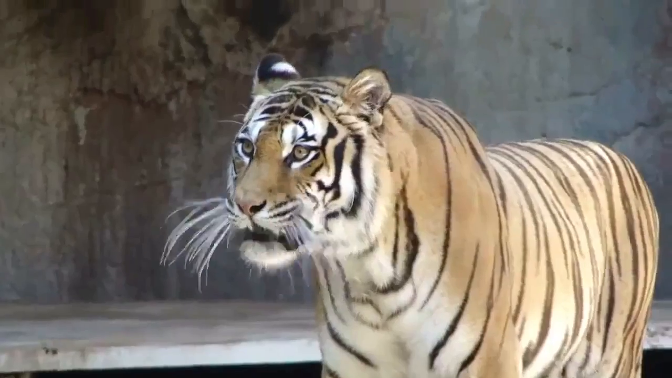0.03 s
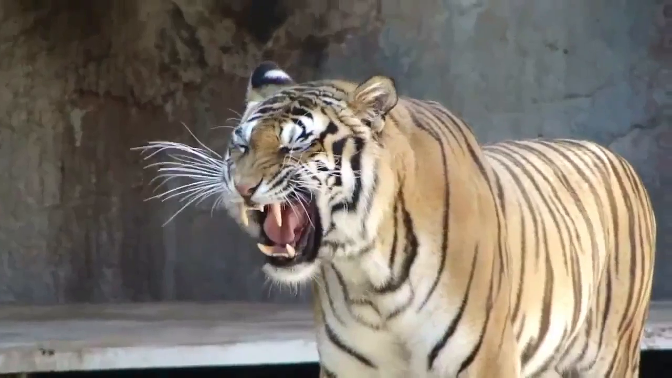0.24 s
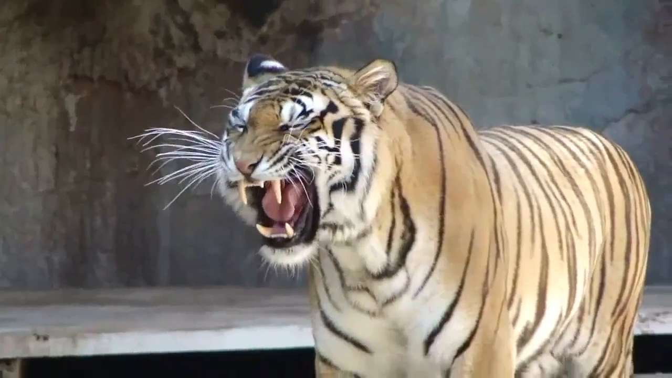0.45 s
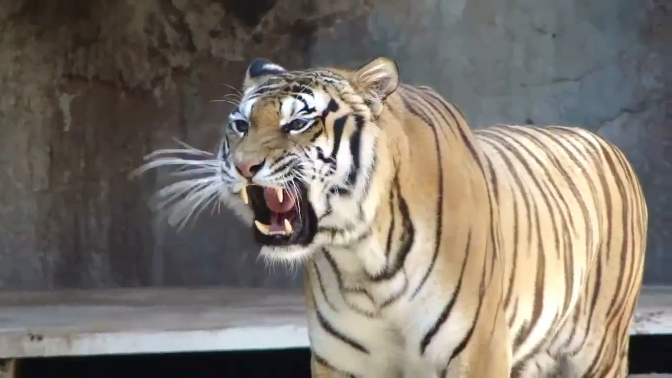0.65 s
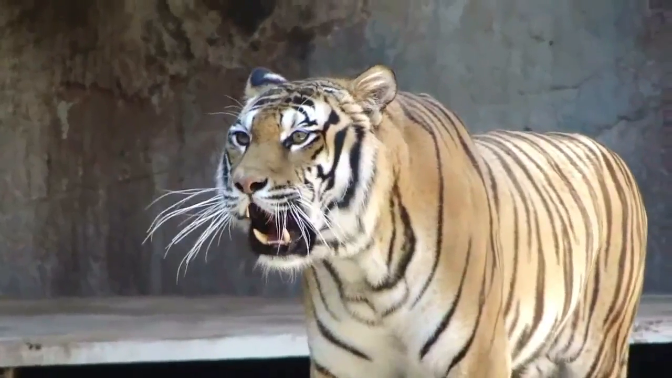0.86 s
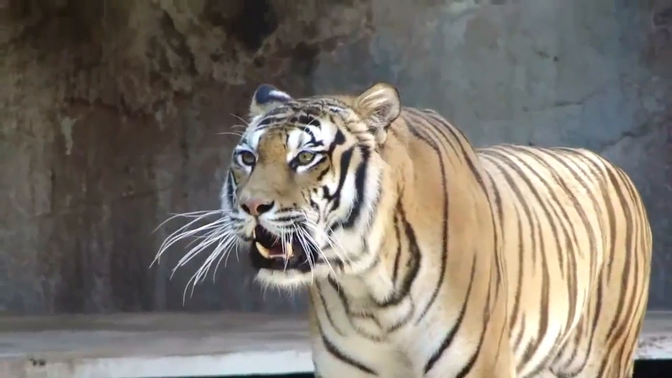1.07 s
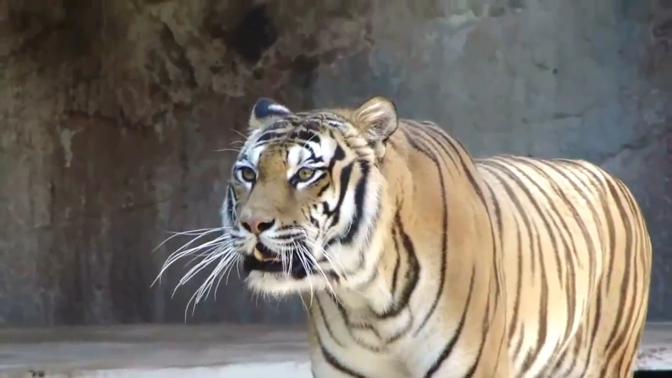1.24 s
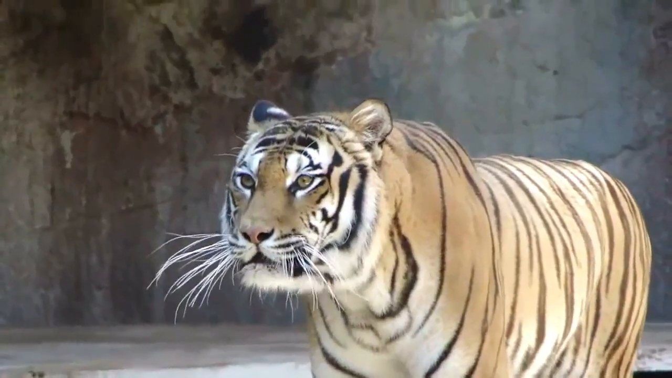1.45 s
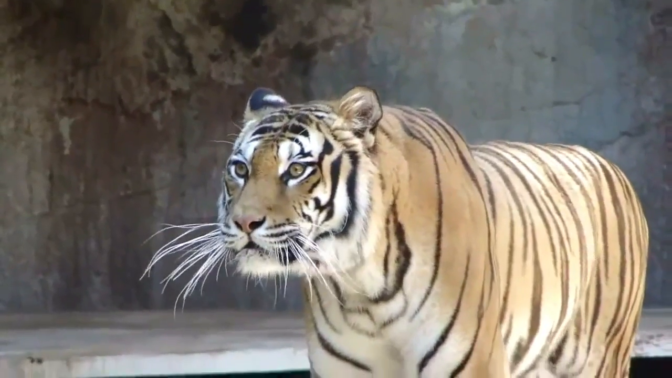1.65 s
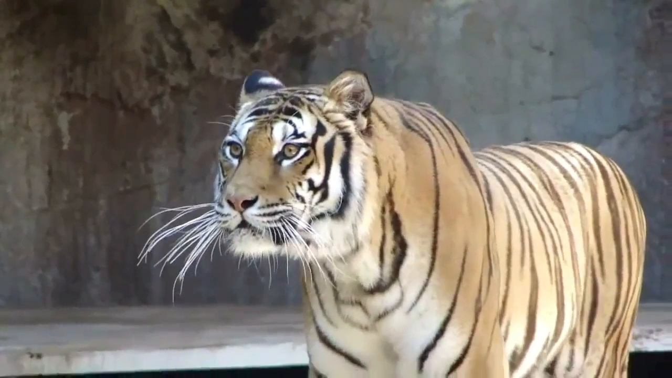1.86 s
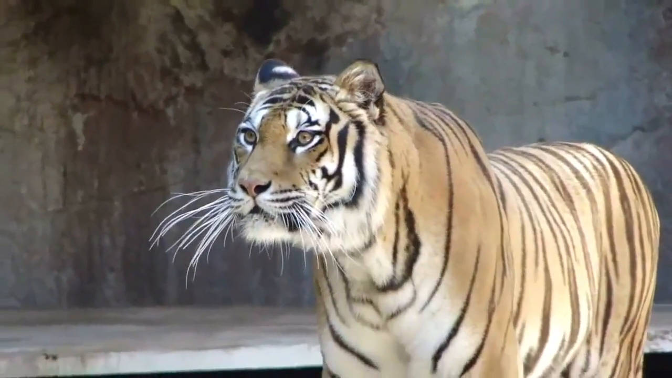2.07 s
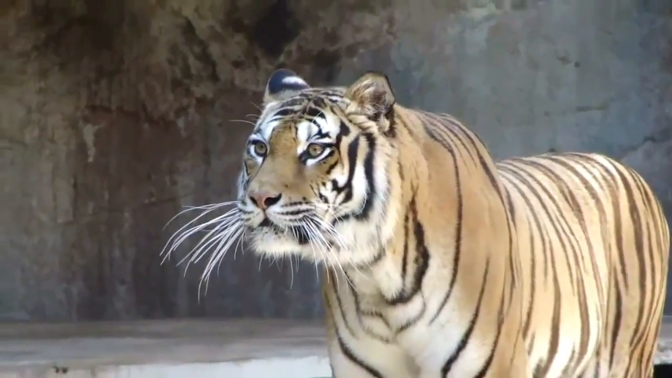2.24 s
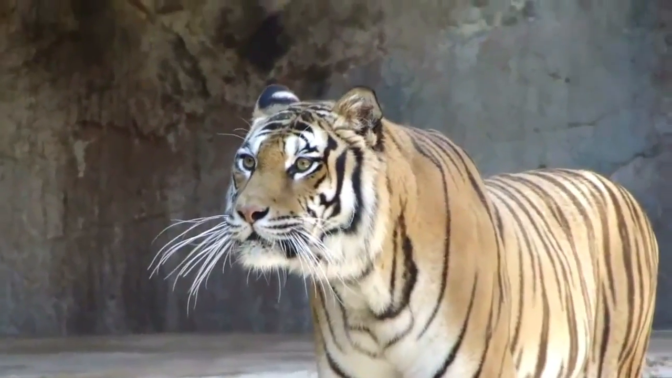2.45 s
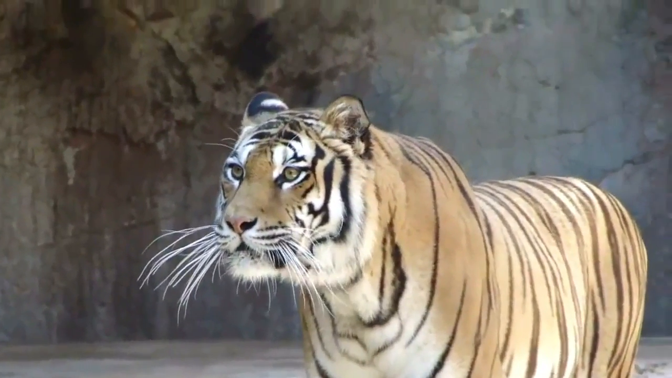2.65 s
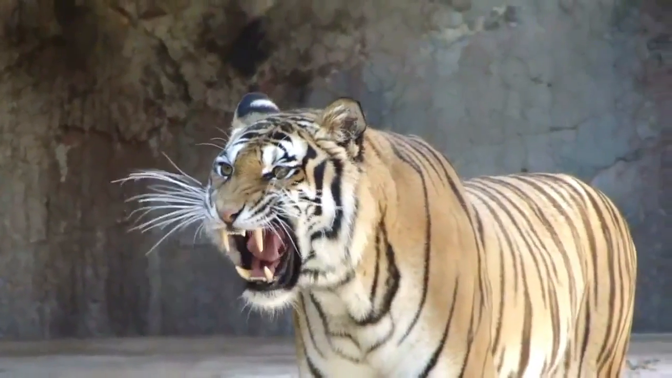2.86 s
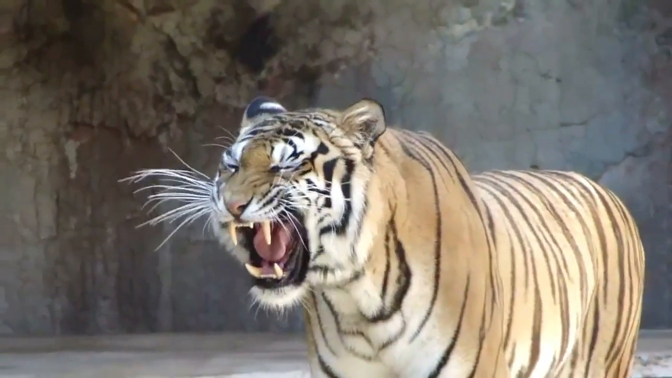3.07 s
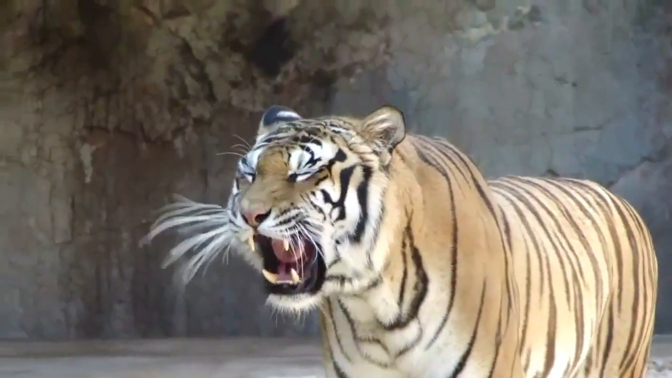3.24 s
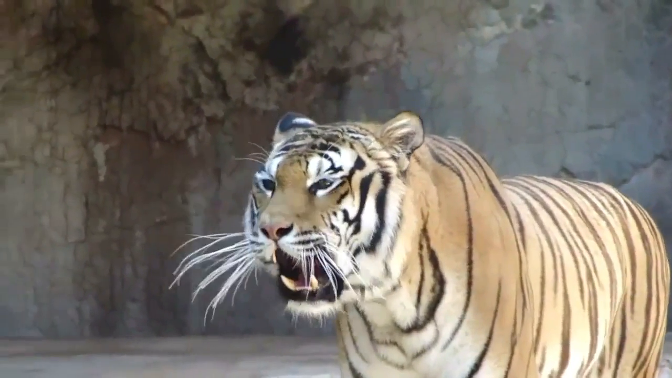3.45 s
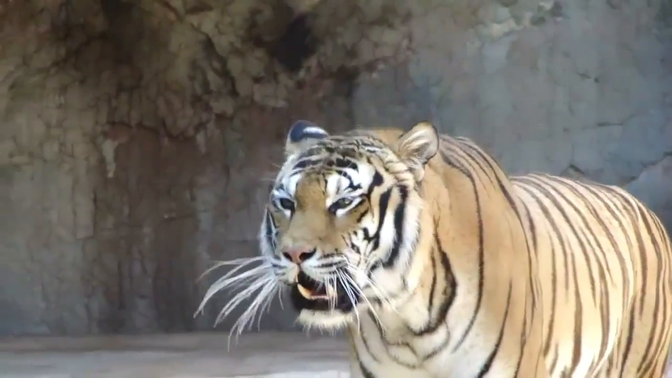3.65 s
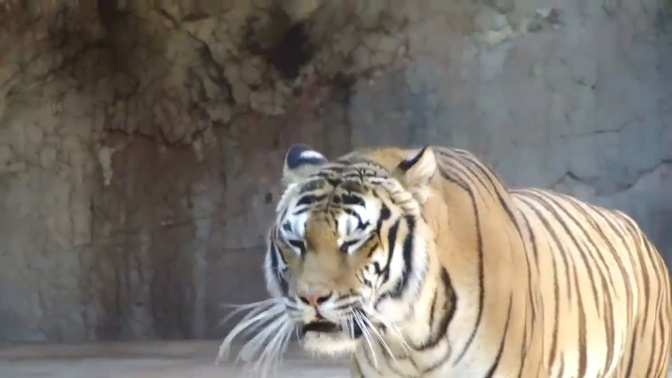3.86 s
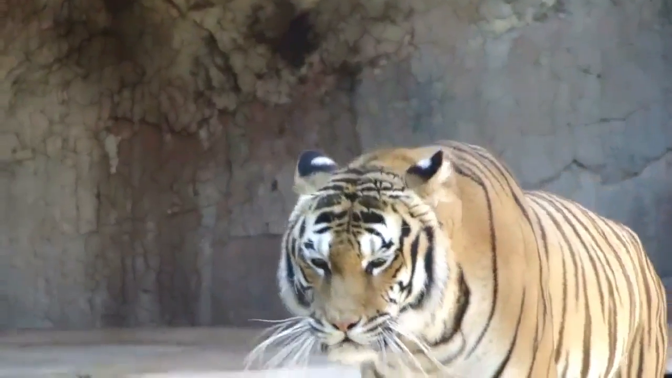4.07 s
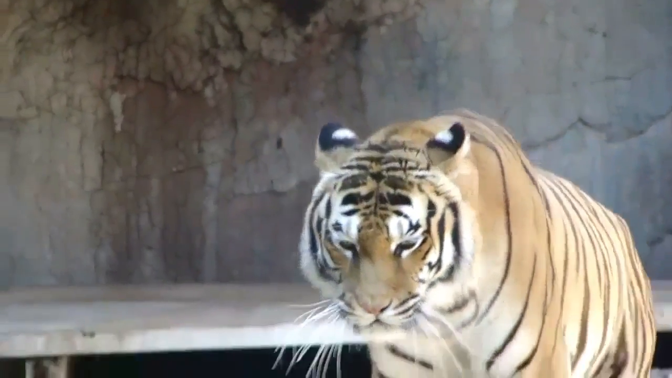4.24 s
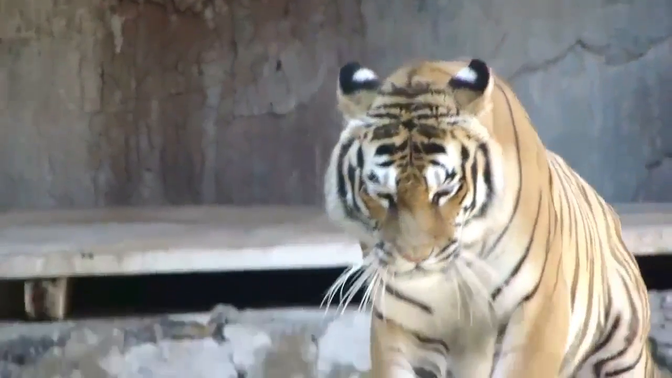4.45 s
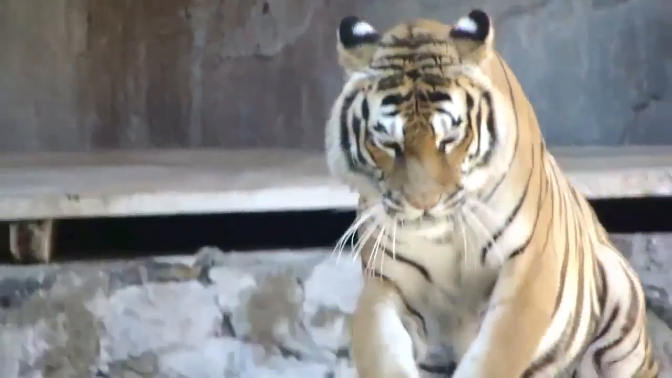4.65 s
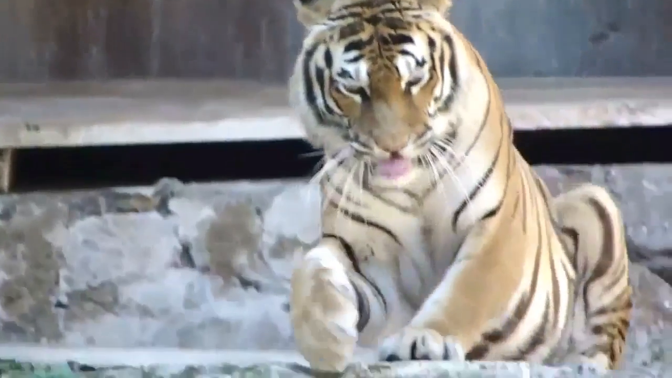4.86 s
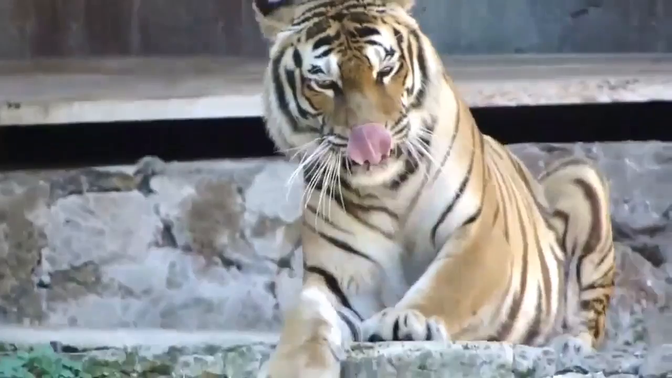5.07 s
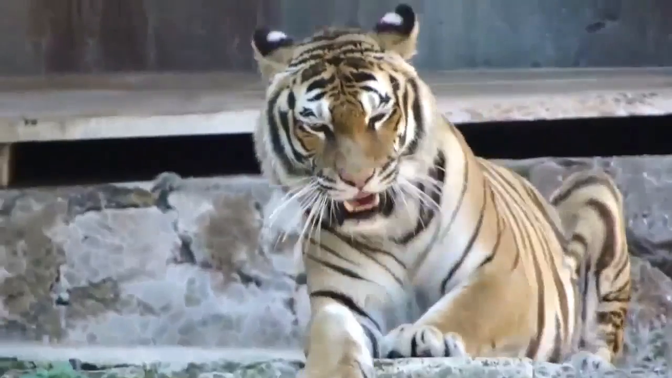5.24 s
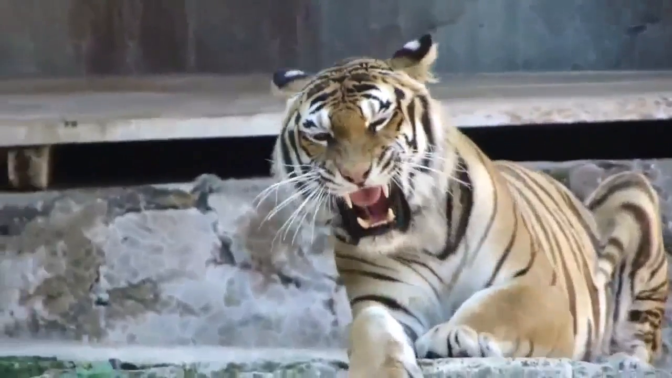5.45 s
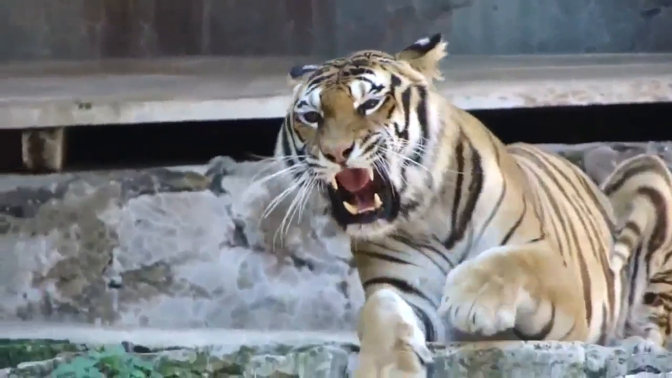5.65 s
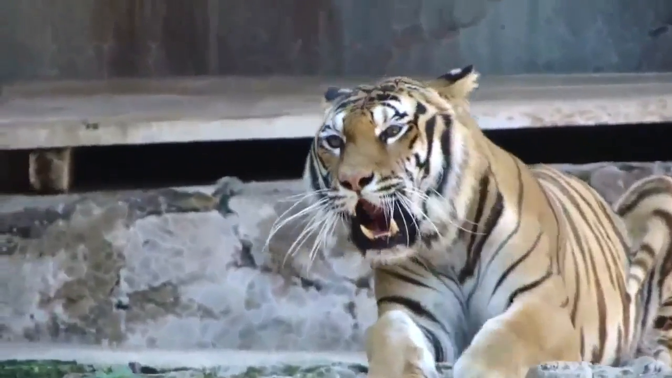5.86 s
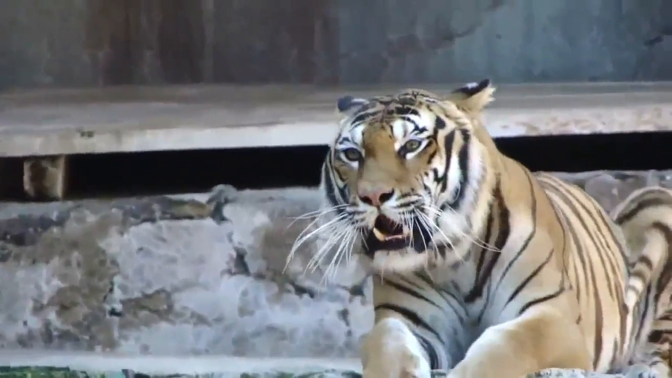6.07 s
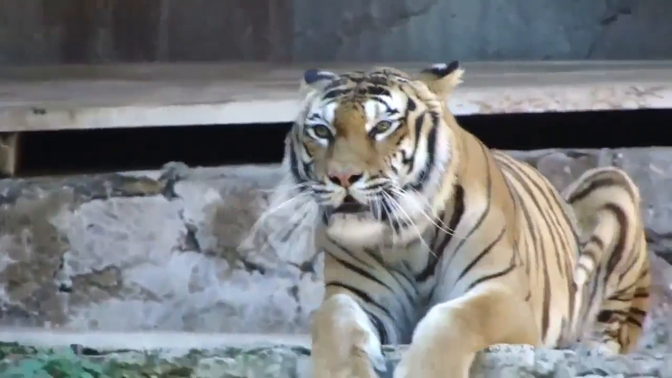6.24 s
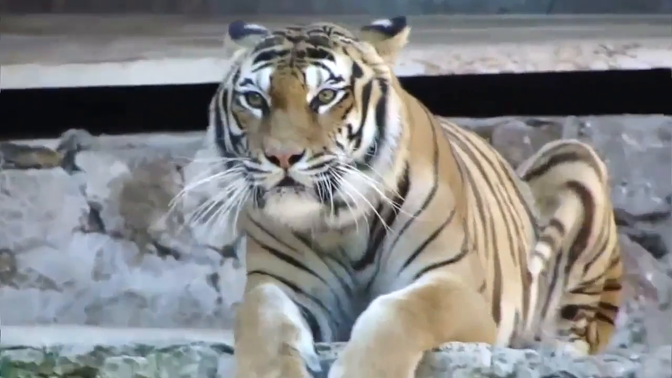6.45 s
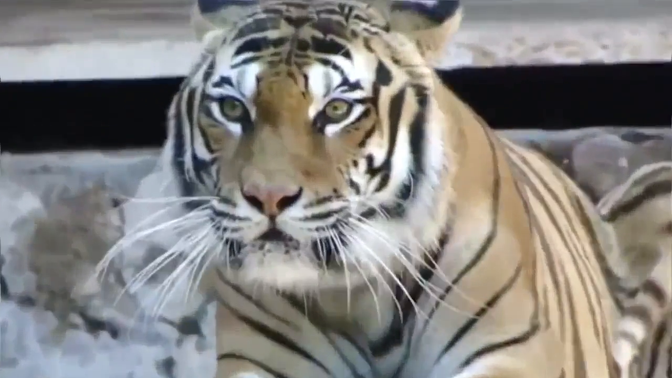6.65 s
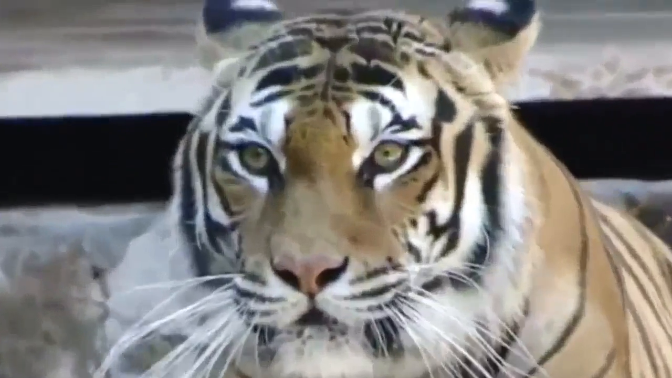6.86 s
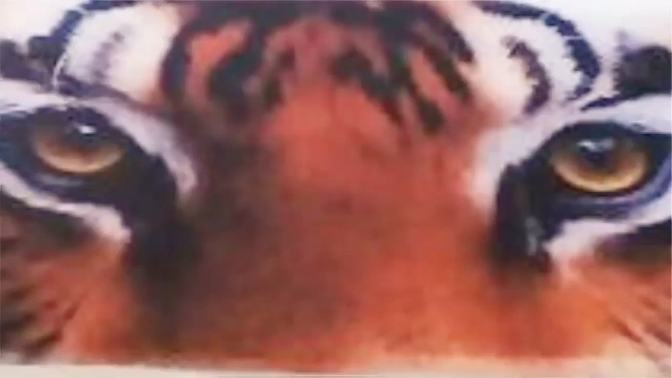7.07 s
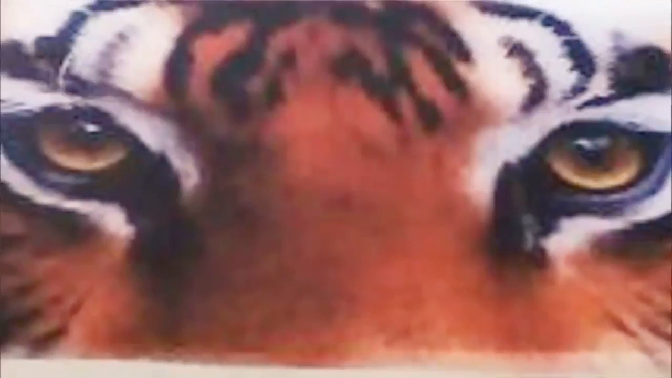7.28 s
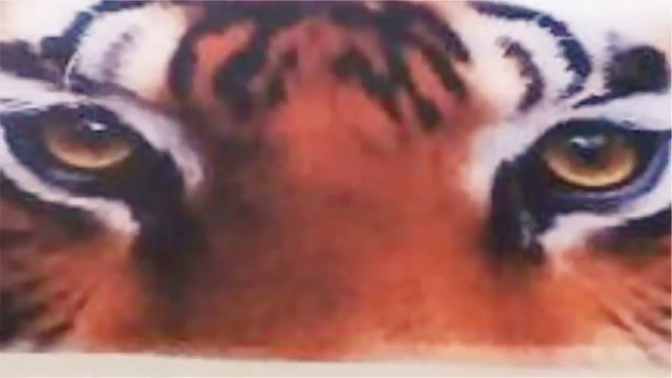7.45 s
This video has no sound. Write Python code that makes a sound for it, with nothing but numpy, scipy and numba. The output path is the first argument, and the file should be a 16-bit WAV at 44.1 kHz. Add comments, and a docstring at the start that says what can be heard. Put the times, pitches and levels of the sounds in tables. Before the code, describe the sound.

A tiger is heard very close and dry, with faint steady hiss and dulled treble. At 0 s it bursts into a rough snarl, strongest around 0.3-0.8 s: deep chest flaps, about 40-50 a second, with hoarse throat and breathy rasp. From 0.9 s it slows to a rattling growl near 32 a second, easing by 1.7 s into a softer rumble with spit crackle, a faint wet slurp and lip clicks around 2.1 s. At 2.73 s the identical snarl and roar returns, briefly overlapping the old growl. It sinks again, quiet near 4.4 s, with a barely audible twitter, then slurp and clicks around 4.9 s. The low growl swells from 5.5 to 6.4 s, open and gravelly with distinct knocking flaps, then fades through 7.3 s. Sound cuts to silence at 7.37 s for a twentieth of a second, then a last short growl ends abruptly at 7.5 s.

```python
"""A big cat's roar

A big cat snarls, roars and sinks into a long growl, close to the microphone.
Thick vocal folds flap about 24-54 times a second; each flap rings chest, throat and mouth and lets out a puff of breath.
Spit crackles, lips click, and a slurp, a whistle and a twitter are heard faintly.
The opening snarl and roar are heard twice, identical and overlapping; near the end the sound is cut off for a moment."""
import sys
import numpy as np
from scipy import signal
from scipy.io import wavfile
from scipy.ndimage import uniform_filter1d
from numba import njit

SR = 44100
rng = np.random.default_rng(int(sys.argv[2]) if len(sys.argv) > 2 else 0)


def convert_level_to_amplitude(level_db):
    """Map a level in decibels to its linear amplitude factor."""
    exponent = np.asarray(level_db, float) / 20
    return 10 ** exponent


def generate_wav(signal):
    """Clip the signal to [-1, 1] and save it as 16-bit WAV at the path in sys.argv[1]."""
    frames = np.transpose(np.atleast_2d(signal))
    scaled = np.clip(frames, -1, 1) * 32767
    pcm = np.round(scaled).astype(np.int16)
    wavfile.write(sys.argv[1], SR, pcm)


N = 331191

# How fast the vocal folds flap. Each row: time in seconds, flaps per second.
FLAP_RATE = [(2.733, 52.7), (2.803, 42.0), (3.044, 46.0), (3.12, 40.0), (3.239, 54.2), (3.321, 46.7),
             (3.408, 45.0), (3.824, 32.0), (4.299, 35.1), (4.416, 32.5), (4.763, 36.4), (4.902, 23.9),
             (5.562, 36.4), (5.893, 36.1), (6.089, 45.5), (6.509, 30.9), (7.51, 26.2)]
# The vocal tract. Each row: time in seconds, chest, throat and mouth resonance in Hz, roughness from 0 to 1.
TRACT = [(2.73, 150, 515, 840, 0.8), (2.93, 150, 500, 760, .7), (3.08, 124, 471, 703, 0.62),
         (3.17, 104, 480, 720, 0.55), (3.24, 130, 490, 760, .85), (3.28, 160, 330, 740, 0.94),
         (3.4, 118, 370, 727, 0.93), (3.5, 110, 350, 850, .7), (3.62, 105, 370, 640, 0.3),
         (3.85, 105, 345, 700, .45), (4.03, 105, 358, 760, 0.67), (4.42, 116, 255, 640, 0.35),
         (4.52, 125, 270, 770, .2), (4.85, 101.5, 286, 700, 0.22), (5.05, 99, 277, 740, 0.3),
         (5.2, 159.5, 295, 800, 0.15), (5.42, 170.5, 284, 810, .2), (5.6, 163, 482, 786, 0.7),
         (5.8, 150, 520, 800, .6), (5.9, 165, 420, 800, .3), (6.05, 180, 560, 830, .6),
         (6.3, 172, 480, 850, .55), (6.42, 135, 380, 860, .35), (6.5, 165, 325, 875, .35),
         (6.72, 167, 310, 890, .3), (6.85, 168, 300, 900, .55), (6.97, 170, 293, 910, 0.15),
         (7.36, 169, 282, 920, 0.1), (7.42, 107, 285, 666, 0.42)]
# Single flaps that sound apart, strong or soft; the beat falls in step with them.
# Each row: time in seconds, strength in dB.
SINGLE_FLAPS = [(2.806, -9.5), (2.87, -12), (2.943, -11.5), (2.985, -11.5), (3.005, -11.5), (3.042, -8.5),
                (3.064, -6.5), (3.157, -12), (3.181, -7), (3.201, -6), (3.593, -7), (3.619, -12),
                (3.647, -13), (3.674, -11.5), (3.702, -10.5), (3.756, -16), (3.82, -17), (3.876, -14),
                (4.065, -12), (4.509, -23), (4.541, -22), (4.62, -23.5), (4.648, -24), (4.678, -27),
                (4.788, -20.5), (5.2, -27), (5.323, -20), (5.472, -22), (5.669, -18), (5.723, -13),
                (5.889, -19), (6.062, -14), (6.176, -18.5), (6.354, -13), (6.383, -16), (6.413, -11),
                (6.441, -18), (6.668, -21.5), (6.7, -25), (6.736, -24), (6.905, -31), (6.971, -28),
                (7.009, -31), (7.077, -32), (7.292, -37), (7.422, -36.5), (7.45, -17)]
# Loudness. Each row: time in seconds, chest in dB, then throat and breath in dB above the chest.
VOICE_LEVEL = [(2.74, -41, -11, -12), (2.81, -19.5, -4.5, -16.5), (2.89, -27, 4, -28.5),
               (2.965, -16, -1, -28.5), (3.05, -11.5, 0, -28), (3.105, -16, -10, -32),
               (3.146, -47, -4, -13), (3.158, -15.5, -4, -21.5), (3.2, -13.5, -1.5, -18),
               (3.25, -15.5, 4, -8.5), (3.305, -18.5, 12, -5), (3.37, -14.5, 4.5, -8.5),
               (3.43, -12, -0.5, -14), (3.6, -15.5, -2, -22), (4.05, -20, -4.5, -19),
               (4.15, -21.5, -4.5, -19.5), (4.355, -26, -5.5, -22), (4.46, -32, -3.5, -29.5),
               (4.5, -23.5, 0.5, -22), (4.945, -24.5, -9, -30.5), (5.02, -30.5, -6.5, -26.5),
               (5.2, -26, -7, -29.5), (5.47, -23, -7, -25), (5.65, -19.5, -5.5, -22), (5.79, -20, -3, -22),
               (5.85, -23.5, -9, -28.5), (5.92, -18.5, -8, -25), (6.07, -17, -7.5, -22),
               (6.135, -17, -6.5, -25), (6.17, -23.5, -2.5, -17.5), (6.23, -17.5, -12, -27),
               (6.3, -17.5, -13.5, -27.5), (6.34, -24, -1, -22), (6.42, -19, -9, -26.5),
               (6.9, -32, -6.5, -23), (7.35, -34.5, -10.5, -24), (7.42, -25, 0.5, -20.5),
               (7.51, -26.5, -5, -27.5)]
# Upper resonances that colour the breath. Each row: time in seconds, first, second and third resonance
# in Hz, ring in Hz, mouth opening from 0 to 1.
UPPER = [(2.73, 1280, 2270, 3200, 3900, 0), (2.92, 1380, 2470, 3230, 3850, 0.6),
         (3.0, 1440, 2160, 3040, 3740, 1), (3.18, 1100, 2780, 3530, 4030, 0.71),
         (3.27, 1040, 2290, 2770, 3840, 1), (3.33, 1250, 2320, 3100, 3540, 0.67),
         (3.4, 1190, 2200, 3110, 3370, 0.56), (3.8, 990, 2320, 3190, 3630, 0.75),
         (4.15, 1170, 2180, 3330, 3820, 1), (4.42, 1440, 2470, 3060, 3900, 1),
         (4.5, 1530, 2490, 3250, 3760, 0.45), (4.9, 1430, 2160, 2820, 3780, 0.79),
         (5.35, 1680, 2190, 2600, 3990, 0.49), (5.85, 1320, 1990, 2600, 4040, 0.68),
         (6.4, 1400, 1980, 2440, 4030, 0.69), (7.36, 1460, 1810, 2480, 4000, 0.37),
         (7.42, 1500, 2230, 2950, 3820, 0.7)]
# Lips drawn back add a higher ring. Each row: time in seconds, its share against the main ring.
FLARE = [(2.73, 0.33), (3.3, 0.62), (4.1, 1.03), (4.5, 0.25), (5.85, 0.18), (5.95, 1.1), (6.2, 1.6),
         (6.9, 0.37), (7.51, 0.19)]
# Extra resonances between the upper ones. Each row: centre in Hz, width in Hz, level in dB.
BETWEEN = [(1610, 270, 8.5), (1990, 330, -13.5), (2600, 520, 6), (3450, 12, 16)]
# Small fixed cavities behind the teeth. Each row: centre in Hz, width in Hz, level in dB.
TEETH = [(5500, 500, -2), (6600, 450, 0), (7600, 900, -5), (9000, 1800, -7), (10200, 900, -9)]
# Changing tone colour. Each row: time in seconds, extra ring, mouth and hiss in dB.
TONE_COLOUR = [(2.73, -10, 5.5, -4.5), (2.85, -14, -4.5, -17.5), (2.96, 0, 4.5, 10.5), (3.1, 4, 2.5, 7),
               (3.3, -2.5, -2.5, 4.5), (4.1, -4, 3, 1), (4.4, 2.5, 6, 1), (4.55, 5.5, 3.5, 4),
               (5.2, 5, 4, 7), (5.85, 2, 3.5, 0), (6.15, 4, 4, 6.5), (6.6, -1.5, 8.5, 0),
               (7.11, -2.5, 5.5, -10), (7.15, -4, 9, -3), (7.2, -4, 10, -7), (7.26, -7, 1.5, -1),
               (7.43, 7, 6, 4)]
# Clear gliding tones sung by the fold edges. Each row: start in Hz, end in Hz, level in dB.
TONE_GLIDES = [(333.5, 366, -13.5), (104, 139, -24), (4130, 3950, -30.5)]
# When those tones sound, in the same order. Each row: start in seconds, length in seconds.
TONE_TIMES = [(3.28, .1), (4.89, .09), (5.826, .028)]
# Wet lip clicks. Each row: time in seconds, strength in dB before a fixed boost and a filter.
LIP_CLICKS = [(4.8833, -36), (4.9222, -36), (4.9494, -41)]
# A faint high twitter of steady tones. Each row: pitch in Hz, level in dB.
TWITTER = [(9130, -66), (9964, -59)]

START_S = 2.7333                        # the call begins here; its opening is also laid in front
OVERLAP_END_S, OVERLAP_FADE_S = 2.921, 0.002    # the first pass runs on under the second until here
CUT_START_S, CUT_END_S = 7.369, 7.4185  # silent gap
EDGE_LEAD_S, EDGE_LEAD_DB = 0.0065, -3  # the lower edge of rough folds parts a moment before the main flap
SNAP_S = 0.0026                         # a single flap peaks this long after it starts
CHEST_LEAD_S = 0.0019                   # the chest's push builds up just before the folds snap
WOBBLE_PER_S, WOBBLE_SHARE = 18, 0.06   # unsteady pitch of the cavities, scaled by roughness
UNEVEN_PER_S, UNEVEN_DB = 28, 3         # unsteady loudness of the cavities, scaled by roughness
# Mouth, ring and hiss follow the breath: dB above the chest at a usual breath, share of the breath's swing.
USUAL_BREATH_DB = -22
MOUTH_FOLLOWS, RING_FOLLOWS, HISS_FOLLOWS = (-14, 0.9), (-27, 0.93), (-39.5, 1.15)


def cat():
    """The whole voice: flaps and breath ring the tract, and each cavity follows its own loudness."""
    chest_hz, throat_hz, mouth_hz, rough = in_time(TRACT)
    first_hz, second_hz, third_hz, ring_hz, opening = in_time(UPPER)
    chest_hz, throat_hz, mouth_hz, first_hz, second_hz, third_hz = (
        unsteady(hz, rough) for hz in (chest_hz, throat_hz, mouth_hz, first_hz, second_hz, third_hz))
    rough, shut = rough.clip(0, 1), 1 - opening.clip(0, 1)
    chest_db, throat_db, breath_db = in_time(VOICE_LEVEL)
    mouth_db, ring_db, hiss_db = (
        db + share * (breath_db - USUAL_BREATH_DB)
        for db, share in (MOUTH_FOLLOWS, RING_FOLLOWS, HISS_FOLLOWS))
    extra_ring_db, extra_mouth_db, extra_hiss_db = in_time(TONE_COLOUR)

    flaps, slit = folds(rough, chest_db)
    flow = flaps + (0.008 + 0.025 * rough) * slit * rng.standard_normal(N)
    layers = [
        (band(throat(flow, throat_hz, rough), 203, 705), throat_db),
        (band(mouth(flow, flaps, slit, mouth_hz, rough, shut), 520, 863), mouth_db + extra_mouth_db),
        (band(breath(flaps, slit, (first_hz, second_hz, third_hz), rough, shut), 480, 4300), breath_db),
        (band(ring(flaps, slit, ring_hz), 3470, 4850), ring_db + extra_ring_db),
        (band(hiss(flaps, slit), 4000, 22000), hiss_db + extra_hiss_db)]
    voice = even(band(chest(flow, chest_hz, rough), 30.6, 210, order=1))
    voice = np.roll(voice, -round(CHEST_LEAD_S * SR))
    voice += convert_level_to_amplitude(breath_db) * crackle(slit)
    for layer, db in layers:
        uneven_db = UNEVEN_DB * (0.84 + 0.18 * rough) * wander(UNEVEN_PER_S)
        voice += convert_level_to_amplitude(db + uneven_db) * even(layer)
    return convert_level_to_amplitude(chest_db) * voice + knocks(mouth_hz)


def folds(rough, chest_db):
    """Main flaps of uneven strength, stray slaps when rough, and the slit that lets breath pass."""
    playing = np.arange(N) > START_S * SR
    turns = np.cumsum(in_time(FLAP_RATE)[0] * playing) / SR
    single_at = ((np.array(SINGLE_FLAPS)[:, 0] + 0.0038) * SR).astype(int)
    single = turns[single_at]
    # the beat falls in step with the single flaps
    turns += np.interp(turns, [0, *single], [0, *(np.round(single) - single)])
    beat = np.flatnonzero(np.diff(np.floor(turns)))
    luck = rng.standard_normal((len(beat), 4))
    delay_s = -0.0012 + 0.00225 * rough[beat] * luck[:, 0]
    at = (beat + SR * delay_s).astype(int).clip(0, N - 1)
    flaps = np.zeros(N) + 1e-18
    flaps[at] = convert_level_to_amplitude((3.8 + 1.2 * rough[beat]) * luck[:, 1])
    lead = (EDGE_LEAD_S * SR * (1 + 0.25 * luck[:, 2]).clip(0.3)).astype(int)
    flaps[at - lead] -= rough[beat] * convert_level_to_amplitude(EDGE_LEAD_DB + 0.84 * luck[:, 3])

    stray = rng.random(N) < (12 + 420 * rough ** 2.2) / SR
    stray_size = np.sqrt(rough) * convert_level_to_amplitude(-4.0 + 1.4 * rng.standard_normal(N))
    flaps += stray * stray_size * rng.choice([1, 1, -1], N)     # one in three pushes the other way
    for s, db in SINGLE_FLAPS:
        i = round(s * SR)
        flaps[i - 250:i + 250] = 0      # clears the other flaps around it
        flaps[i + round(SNAP_S * SR)] = convert_level_to_amplitude(db - chest_db[i] - 3.0)
    shape = signal.windows.hann(round(0.015 * SR))      # the slit opens and closes smoothly around each flap
    slit = np.roll(signal.fftconvolve(np.abs(flaps), shape)[:N], -round(0.0045 * SR))
    return flaps, slit + 0.3 + 1.3 * rough ** 2


def chest(flow, chest_hz, rough):
    """The chest rings at its own pitch over a heavy push of air that dies down at once."""
    kick = np.diff(flow, prepend=0)     # the mouth radiates the change of flow: a spike up, then a deep dip
    shove = cavity(flow, 0.88 * chest_hz, 54.4)
    return even(cavity(kick, chest_hz, 15.6)) + convert_level_to_amplitude(1.0 - 1.6 * rough) * even(shove)


def throat(flow, throat_hz, rough):
    """The throat's moving resonance, a plain band of the flow and a windpipe resonance that stays put."""
    moving = even(cavity(flow, throat_hz, 75 + 55 * rough))
    windpipe = even(cavity(flow, 220, 35))
    return moving + 0.19 * even(band(flow, 130, 448)) + 0.48 * windpipe


def mouth(flow, flaps, slit, mouth_hz, rough, shut):
    """The mouth rings with flaps and breath; its higher ring fades as it shuts."""
    wet = flow + (0.008 + 0.08 * rough) * puffs(slit, flaps, 0, patchy_db=3.5)
    out = even(cavity(wet, mouth_hz, 38 + 100 * rough)) + 0.28 * even(band(wet, 333, 895))
    out -= convert_level_to_amplitude(-1 - 14 * shut) * even(narrow(wet, 1030, 110))
    wavering_hz = 570 * (1 + 0.13 * wander(20))
    return out + (0.48 + 1.17 * rough) * even(narrow(wet, wavering_hz, 92))


def breath(flaps, slit, upper_hz, rough, shut):
    """Puffs of breath ring the upper resonances, the higher ones fading as the mouth shuts."""
    first_hz, second_hz, third_hz = upper_hz
    out = even(narrow(puffs(slit, flaps, 30.0, patchy_db=2.5), first_hz, 220 + 350 * rough))
    second = narrow(puffs(slit, flaps, 2.9, patchy_db=-2.0), second_hz, 340 + 250 * rough)
    out -= convert_level_to_amplitude(2.5 - 14.0 * shut) * even(second)
    third = narrow(puffs(slit, flaps, 2.5, patchy_db=0.5), third_hz, 260 + 300 * rough)
    out += convert_level_to_amplitude(3.5 - 28.4 * shut) * even(third)
    rasp = band(puffs(slit, flaps, 2.1, patchy_db=2.5), 800, 1600)      # broad rasp of rough folds
    out += rough * even(rasp)
    between = coloured(puffs(slit, flaps, 0.99, patchy_db=5.0), BETWEEN)
    return out + convert_level_to_amplitude(1 - 13.0 * shut) * even(between)


def ring(flaps, slit, ring_hz):
    """Breath rings a bright resonance, with a higher one when the lips are drawn back."""
    flare, = in_time(FLARE)
    main = even(narrow(puffs(slit, flaps, 4.4, patchy_db=-0.5), ring_hz, 590))
    higher = even(narrow(puffs(slit, flaps, 2.2, patchy_db=-2.5), 4930, 1200))
    return main - flare.clip(0) * higher


def hiss(flaps, slit):
    """Thin hiss of breath through small fixed cavities behind the teeth."""
    return coloured(puffs(slit + 0.81, flaps, 1.9, patchy_db=2.0), TEETH)


def puffs(slit, flaps, snap, patchy_db):
    """Breath through the slit in uneven gusts, with the snap of the flap itself."""
    points = N // 300 + 2       # one gust value every 300 samples
    gusts = np.interp(np.arange(N) / 300, np.arange(points), rng.standard_normal(points))
    return convert_level_to_amplitude(patchy_db * gusts) * (slit * rng.standard_normal(N) + snap * flaps)


def knocks(mouth_hz):
    """Each single flap adds a sharp spike of air, a short ring in the mouth and a crack on top."""
    hits = np.zeros(N) + 1e-18
    for s, db in SINGLE_FLAPS:
        hits[round((s + SNAP_S - CHEST_LEAD_S / 2) * SR)] = convert_level_to_amplitude(db)
    spike = convert_level_to_amplitude(20) * band(band(hits, 160, 800, order=1), 40, 2200)
    mouth_ring = convert_level_to_amplitude(7) * band(cavity(hits, mouth_hz, 300), 300, 1600)
    crack = convert_level_to_amplitude(-15) * band(hits, 1000, 4200)
    return spike + mouth_ring + crack


def crackle(slit):
    """Spit pops at random, mostly while the slit is open; each pop rings briefly at one of 12 pitches."""
    pops_per_s, level_db, spread_db, ring_cycles = 85, -8.5, 2.5, 20.5      # level is against the breath
    born = rng.random(N) < pops_per_s * slit / slit.mean() / SR
    pops = born * convert_level_to_amplitude(spread_db * rng.exponential(1, N).clip(0, 4)) + 1e-18
    dealt, out = rng.integers(0, 12, N), 0
    for k, hz in enumerate(np.geomspace(697, 5205, 12)):
        r, w = convert_level_to_amplitude(-60 * hz / (ring_cycles * SR)), 2 * np.pi * hz / SR
        mine = pops * (dealt == k) + 1e-18
        out = out + signal.lfilter([0, np.sin(w)], [1, -2 * r * np.cos(w), r * r], mine)
    return convert_level_to_amplitude(level_db) * out / np.sqrt(np.mean(out ** 2))


def sung_tones():
    """At a few moments the fold edges sing a clear gliding tone."""
    return sum(tone(*when, *glide_row) for when, glide_row in zip(TONE_TIMES, TONE_GLIDES))


def tone(start, length, from_hz, to_hz, db):
    """A clear sine tone that glides in pitch and swells in and out."""
    t, end = np.arange(N) / SR, start + length
    on = np.interp(t, [start, start + 0.014, end - 0.02, end], [0, 1, 1, 0])
    hz = np.interp(t, [start, end], [from_hz, to_hz])
    return on * convert_level_to_amplitude(db) * np.sin(2 * np.pi * np.cumsum(hz) / SR)


def slurp():
    """A wet slurp: noise through a narrow resonance that falls in pitch."""
    start, end, rise_s = 4.87, 4.99, 0.02
    peak_db, edge_db = -46, -62
    peak = start + rise_s
    hz, = in_time([(start, 1900), (end, 1150)])
    db, = in_time([(start, edge_db), (peak, peak_db), (peak + rise_s * 2, peak_db), (end, edge_db)])
    return convert_level_to_amplitude(db) * even(narrow(rng.standard_normal(N), hz, 300))


def lip_clicks():
    """Wet lips part: single pulses, boosted and narrowed to the treble."""
    clicks = np.zeros(N) + 1e-18
    for s, db in LIP_CLICKS:
        clicks[round(s * SR)] = convert_level_to_amplitude(db + 17)
    return band(clicks, 3500, 7030)


def whistle():
    """A faint steady whistle as the breath turns."""
    return tone(3.08, 0.075, 4710, 4710, -56)


def twitter():
    """A faint high twitter: steady sine tones switched on together for a moment."""
    t, start, end = np.arange(N) / SR, 4.432, 4.475
    on = np.interp(t, [start, start + 0.004, end - 0.004, end], [0, 1, 1, 0])
    return on * sum(convert_level_to_amplitude(db) * np.sin(2 * np.pi * hz * t) for hz, db in TWITTER)


def amplifier_hiss():
    """Steady hiss of the microphone amplifier, silent in the gap."""
    t = np.arange(N) / SR
    return convert_level_to_amplitude(-68) * rng.standard_normal(N) * ((t < CUT_START_S) | (t > CUT_END_S))


def in_time(rows):
    """Each column of a table as a value per sample, joined by straight lines."""
    s, *columns = np.transpose(rows)
    return [np.interp(np.arange(N) / SR, s, c) for c in columns]


def wander(per_s):
    """Random values, so many per second, joined by straight lines."""
    steps = np.arange(N) * per_s / SR
    return np.interp(steps, np.arange(600), rng.standard_normal(600))


def unsteady(hz, rough):
    """A resonance that wobbles in pitch, more so when the voice is rough."""
    return hz * (1 + WOBBLE_SHARE * (0.22 + 0.6 * rough) * wander(WOBBLE_PER_S))


def band(x, low_hz, high_hz, order=2):
    """Keeps mainly the sound between two pitches (Butterworth band-pass)."""
    return signal.sosfilt(signal.butter(order, [low_hz, high_hz], "band", fs=SR, output="sos"), x)


def even(x, over_s=0.035):
    """Brings the slow level to 1; the shape of each flap stays."""
    span = int(over_s * SR)
    power = uniform_filter1d(uniform_filter1d(x ** 2, span), span)
    return x / np.sqrt(power.clip(0) + 1e-12)


@njit
def glide(x, r, cos_w):
    """Two-pole resonance whose centre and width can move from sample to sample."""
    y = np.zeros(len(x))
    for i in range(2, len(x)):
        y[i] = (1 - r[i]) * x[i] + 2 * r[i] * cos_w[i] * y[i - 1] - r[i] * r[i] * y[i - 2]
    return y


def cavity(x, hz, width_hz):
    """An air cavity rings at its centre pitch; the wider it is, the sooner it dies away."""
    flat = np.zeros(N)      # stretches single numbers to one value per sample
    r = np.exp(-np.pi * np.clip(width_hz, 15, 3000) / SR) + flat
    return glide(x, r, np.cos(2 * np.pi * hz / SR) + flat)


def narrow(x, hz, width_hz):
    """The same cavity twice in a row: steep flanks, dark valleys."""
    return cavity(cavity(x, hz, width_hz), hz, width_hz)


def coloured(x, resonances):
    """Fixed resonances side by side, their signs alternating."""
    out = 0
    for k, (hz, width_hz, db) in enumerate(resonances):
        r = np.exp(-np.pi * width_hz / SR)
        top = (1 - r * r) / 2 * np.array([1, 0, -1])
        bottom = [1, -2 * r * np.cos(2 * np.pi * hz / SR), r * r]
        out = out + (-1) ** k * convert_level_to_amplitude(db) * signal.lfilter(top, bottom, x)
    return out


def scene():
    """The whole call, with its first part laid in front once more, overlapping a little."""
    call = cat() + sung_tones() + lip_clicks() + slurp() + whistle() + twitter()
    call *= np.interp(np.arange(N) / SR, [START_S, START_S + 0.0014], [0, 1])
    lag, end = round(START_S * SR), round(OVERLAP_END_S * SR)
    fade = ((end - np.arange(end)) / (OVERLAP_FADE_S * SR)).clip(0, 1)
    call[:end] += call[lag:lag + end] * fade
    call[round(CUT_START_S * SR):round(CUT_END_S * SR)] = 0
    return call[None]


def half_rate(x):
    """Stored at half the rate and coarsely filled in again, so the treble is mirrored above 11 kHz."""
    kept = signal.sosfilt(signal.cheby2(10, 16, 11000, fs=SR, output="sos"), x)
    kept[1::2] = 0
    fill = 0.27     # weight of each neighbour in the empty samples
    return np.convolve(kept, np.array([fill, 2 - 2 * fill, fill]), "same")


def top_cut(x):
    """Nothing passes above the cut-off."""
    return signal.sosfilt(signal.butter(12, 14760, fs=SR, output="sos"), x)


def record(dry):
    """Rounds the peaks, halves the rate, adds amplifier hiss, dulls the top and shifts the zero line."""
    x = 1.12 * np.tanh(dry[0] / 1.12)
    x = half_rate(x) + amplifier_hiss()
    x = signal.sosfilt(signal.cheby2(14, 60, 14600, fs=SR, output="sos"), x)
    x = x + 0.0033      # small constant offset
    mix = x.clip(-0.998, 0.998)[None]
    return top_cut(mix)


dry = scene()
out = record(dry)
generate_wav(out)
```